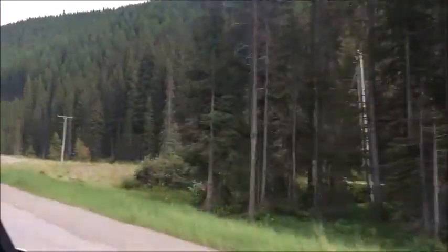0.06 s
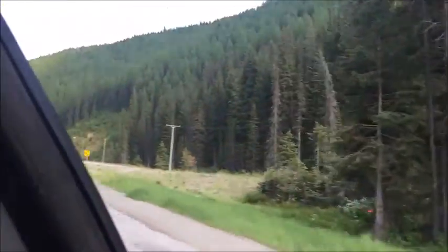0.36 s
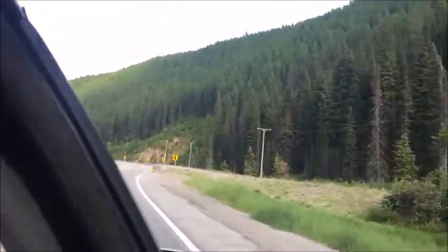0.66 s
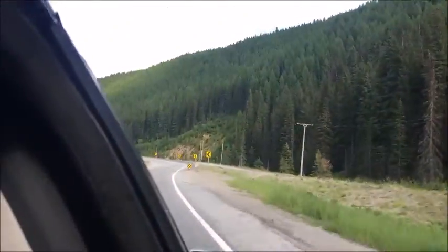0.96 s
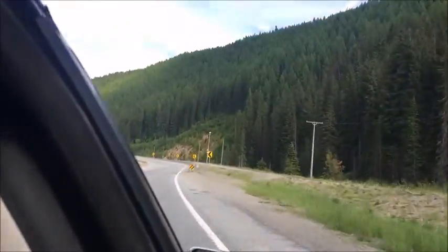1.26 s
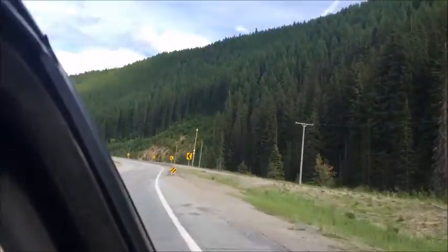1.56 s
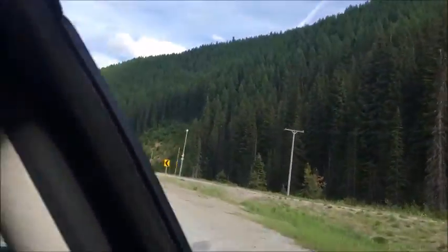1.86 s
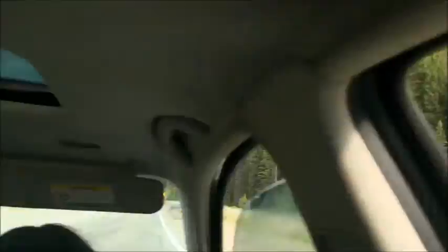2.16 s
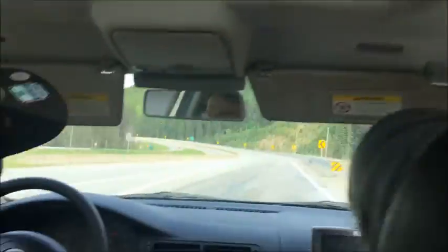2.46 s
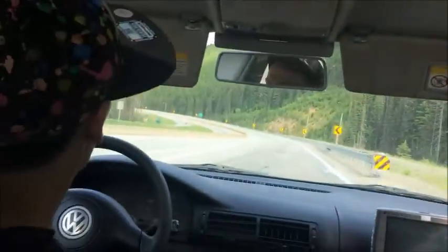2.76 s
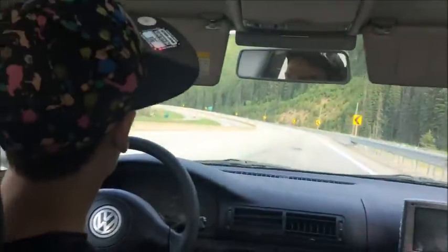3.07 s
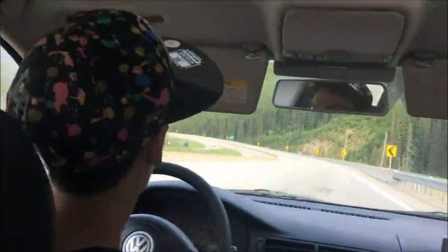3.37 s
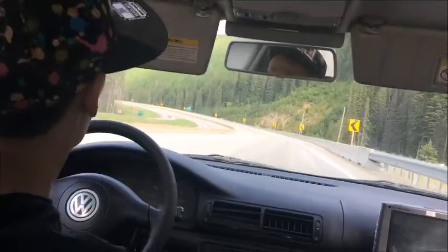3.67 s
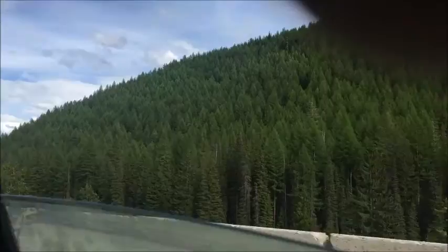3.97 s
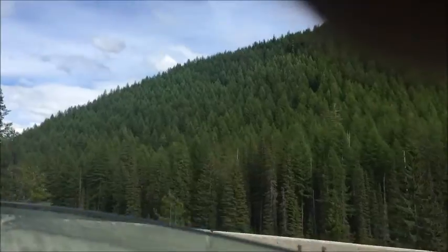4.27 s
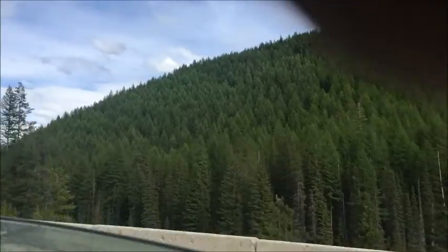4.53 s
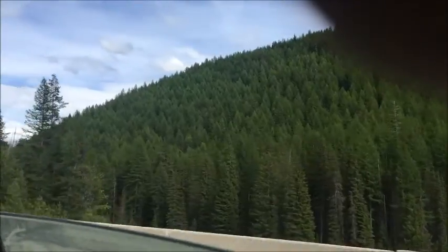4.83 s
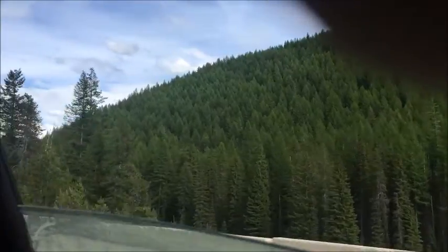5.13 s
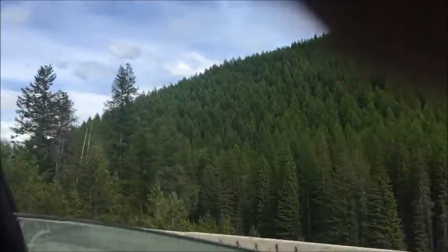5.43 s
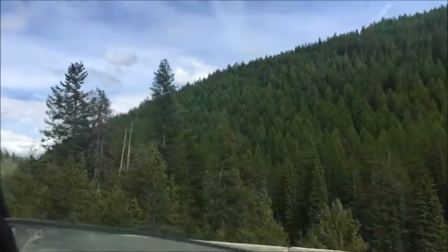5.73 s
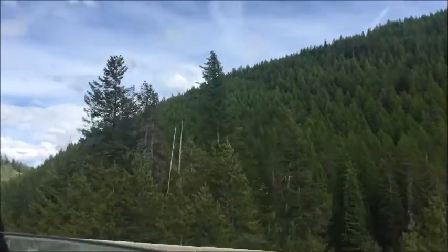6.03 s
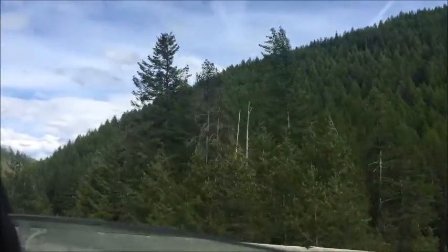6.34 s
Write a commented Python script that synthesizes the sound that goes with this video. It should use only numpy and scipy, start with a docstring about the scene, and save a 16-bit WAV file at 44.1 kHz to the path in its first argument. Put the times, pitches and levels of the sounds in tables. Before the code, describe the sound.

Rough, slapping wind on the microphone of a moving car, interrupted by a short stretch of swelling engine hum and road rumble.

```python
"""A car on a mountain road, a microphone at its open side window. First the slipstream tears at it:
rushing, fizzing turbulence, with eddies that slap and overload it. At 2.2 s it is drawn inside: a dull
knock, then engine boom, body rumble and tyre roar swell while the revs creep up and the trim ticks.
At 4 s the sound breaks off briefly. Back at the window's edge the air is thin and fitful, and single
eddies slap the microphone and overload it again."""
import sys
import numpy as np
from scipy import signal
from scipy.fft import rfft, irfft, next_fast_len
from scipy.io import wavfile
from scipy.ndimage import map_coordinates

SR = 44100
rng = np.random.default_rng(int(sys.argv[2]) if len(sys.argv) > 2 else 0)


def digitize_waveform(pressure):
    """Quantize a signal to 16-bit integers and store it at the path in sys.argv[1].

    Rows of a 2-D input are taken as channels; values are limited to [-1, 1].
    """
    field = np.atleast_2d(pressure).T
    bounded = np.clip(field, -1, 1)
    quanta = np.round(bounded * 32767).astype(np.int16)
    wavfile.write(sys.argv[1], SR, quanta)


N = 286650
TIME = np.arange(N) / SR
INSIDE_S, BREAK_S, RESUME_S = 2.235, 4.02, 4.098


def amp(db):
    """Decibels to gain."""
    return 10 ** (np.asarray(db) / 20)

def unit(x):
    """Scale to rms 1."""
    return x / np.sqrt(np.mean(x ** 2) + 1e-20)

def curves(rows):
    """One automation curve for each column after the time."""
    times, *columns = np.transpose(rows)
    return [np.interp(TIME, times, column) for column in columns]

def fade(start_s, length_s):
    """A ramp from 0 to 1."""
    return np.clip((TIME - start_s) / length_s, 0, 1)

def wobble(rate):
    """A smooth random modulator, rate knots a second."""
    knots = rng.standard_normal(int(N * rate / SR) + 4)
    return map_coordinates(knots, [np.arange(N) * rate / SR])

def eq_gain(hz, spectrum):
    """Gain at hz of an EQ curve drawn through (frequency [Hz], level [dB]) points."""
    points_hz, db = np.transpose(spectrum)
    return amp(np.interp(np.log(hz + 1), np.log(points_hz), db))

def filtered(x, response):
    """Zero-phase EQ; response gives the gain at each frequency."""
    size = next_fast_len(N + SR // 2)
    return irfft(rfft(x, size) * response(np.fft.rfftfreq(size, 1 / SR)), size)[:N]

def noise(spectrum):
    """Coloured noise of rms 1."""
    return unit(filtered(rng.standard_normal(N), lambda hz: eq_gain(hz, spectrum)))

def ringing(x, spectrum):
    """Minimum-phase EQ that keeps the power of white noise: attacks stay sharp, the bass rings on."""
    size = 4096
    log_gain = np.log(eq_gain(np.fft.rfftfreq(size, 1 / SR), spectrum))
    cepstrum = irfft(log_gain) * (1 + np.sign(size / 2 - np.arange(size)))
    response = irfft(np.exp(rfft(cepstrum)))
    return signal.fftconvolve(x, response / np.linalg.norm(response))[:N]

def puffs(swirl, depth_db):
    """White noise that surges with the swirl; the strongest swirls level off."""
    return unit(amp(depth_db * 2 * np.tanh(swirl / 2))) * rng.standard_normal(N)

def turbulence(swirl, spectrum, depth_db):
    """Coloured puffs of air, rms about 1."""
    return ringing(puffs(swirl, depth_db), spectrum)


# Bright click of plastic trim: (frequency [Hz], level [dB])
TRIM_EQ = [(1500, -17), (4000, -1), (4900, -16.5), (5700, 2), (7000, -21), (8800, -11), (11000, -24),
           (15000, -26)]
# Hollow, dull knock: (frequency [Hz], level [dB])
KNOCK_EQ = [(60, -15), (130, 9), (300, -8), (600, 2.5), (1000, -28), (2500, -45), (8000, -62)]
# Cues for the trim ticks: (time [s], relative level [dB])
TRIM_TICKS = [(2.4277, -49), (2.51, -41), (3.1264, -40), (3.685, -36), (3.8627, -33)]

def ticks_and_knock():
    """Light, dry ticks of plastic trim, and one knock as the microphone comes inside."""
    def tap(start, decay_s):
        return fade(start, .001) * np.exp(-np.abs(TIME - start) / decay_s)
    ticks = sum(amp(db - 5.5) * tap(start, decay_s=.007) for start, db in TRIM_TICKS)
    knock = amp(-19.5) * tap(2.325, decay_s=.0084)
    return ticks * noise(TRIM_EQ) + knock * noise(KNOCK_EQ)

# Low rumble of the car body: (frequency [Hz], level [dB])
RUMBLE_EQ = [(15, -24.5), (30, -22), (50, -5.5), (68, 1.5), (90, -8.5), (140, -17), (200, -25.5),
             (320, -34), (600, -43), (1500, -87)]
# Tyre roar through the glass: (frequency [Hz], level [dB])
TYRE_EQ = [(100, -1), (280, 4), (480, -5), (750, -2.5), (1150, -1), (1400, -5), (1750, -5), (2200, -14),
           (3000, -21.5), (4200, -25), (5800, -31.5), (7500, -39.5), (10500, -44), (15500, -37.5)]
# Faders of the cabin swell, in relative levels: (time [s], engine [dB], rumble [dB], tyres [dB])
CABIN_SWELL = [(2.37, -44, -43.5, -50), (2.65, -27.5, -35, -52), (3.1, -22.5, -24.5, -44.5),
               (3.68, -18.5, -23.5, -36), (4.0, -19, -20.5, -38)]

def road():
    """The uneven road makes the body heave and rumble while the tyres roar through the glass."""
    _, rumble_db, tyre_db = curves(CABIN_SWELL)
    heave_db = 2 * np.cos(2 * np.pi * (TIME - 3.37) / .293)  # a crest every 0.293 s
    rumble = amp(rumble_db + 4 + heave_db) * noise(RUMBLE_EQ)
    tyres = amp(tyre_db + 4.5 + .66 * wobble(12)) * noise(TYRE_EQ)
    return rumble + tyres

# Partials of the engine boom: (multiple of the firing rate [x], relative level [dB])
ENGINE_PARTIALS = [(1, 2.5), (2, -11), (3, -29)]

def engine():
    """The firing rate and its overtones boom in the cabin, wavering and creeping up in pitch."""
    boom_db, _, _ = curves(CABIN_SWELL)
    firing_hz = 104.5 + 5.5 * (TIME - INSIDE_S)
    phase = 2 * np.pi * np.cumsum(firing_hz * (1 + .0027 * wobble(18))) / SR
    boom = sum(amp(db + wobble(22)) * np.sin(k * phase) for k, db in ENGINE_PARTIALS)
    return np.sqrt(2) * amp(boom_db) * boom

USUAL_FLOW_DB, BUFFET_SLOPE = -14.5, .34  # reference wind strength; dB of buffeting per dB of flow
# Low-mid rush, the body of all the wind: (frequency [Hz], level [dB])
RUSH_EQ = [(40, -39), (130, -12), (240, -0.5), (390, -3), (570, -1.5), (1000, -7), (2000, -18),
           (3200, -28.5), (5000, -62), (8000, -70), (15000, -85)]
# Coarse midrange grit of torn air: (frequency [Hz], level [dB])
GRIT_EQ = [(400, -19.5), (1000, -0.5), (2000, -0.5), (3200, -5.5), (4300, -9.5), (6000, -27.5),
           (9000, -38.5), (15000, -59.5)]
# Bass buffeting on the microphone: (frequency [Hz], level [dB])
BUFFET_EQ = [(15, -32), (30, -36.5), (48, -1), (65, -0.5), (100, -3), (160, -7.5), (250, -15), (500, -24),
             (1500, -81)]
# Steady bed of air hiss: (frequency [Hz], level [dB])
HISS_EQ = [(300, -2), (1200, 5), (3000, -25.5), (6500, -28), (9000, -30), (15500, -39)]
# The weaker flow at the window's edge: (time [s], relative level [dB])
EDGE_FLOW = [(4.1, -18.5), (4.29, -30), (4.45, -12), (4.56, -25), (4.7, -14), (4.83, -15.5), (4.9, -23.5),
             (5.08, -19), (5.19, -30.5), (5.3, -24), (5.45, -20), (5.85, -25.5), (6.15, -24), (6.35, -26),
             (6.5, -17.5)]

def window_edge():
    """Thin, fitful turbulence over a faint hiss; the buffeting flaps with the larger swirls."""
    flow_db = curves(EDGE_FLOW)[0] + lulls()
    flap = wobble(45)
    swirl = unit(.5 * flap + .44 * wobble(130) + .85 * wobble(400))
    rush = amp(flow_db + 2) * turbulence(swirl, RUSH_EQ, depth_db=9.5)
    grit = amp(flow_db - 15.5) * turbulence(swirl, GRIT_EQ, depth_db=14)
    buffet_db = -13.5 + BUFFET_SLOPE * (flow_db - USUAL_FLOW_DB)
    buffet = amp(buffet_db) * turbulence(flap, BUFFET_EQ, depth_db=6)
    hiss = amp(-43) * noise(HISS_EQ)
    return (rush + grit + buffet + hiss) * fade(RESUME_S, .0016)

def lulls(dip_db=-9.5, length_s=.023):
    """Ducking in dB as the air stalls just before each strong eddy breaks."""
    starts = np.append(np.sort(np.transpose(EDDY_HITS)[0]), np.inf)
    wait = starts[np.searchsorted(starts, TIME)] - TIME
    return dip_db * np.exp(-(wait / length_s) ** 2)

# Fizzing top end of fast air: (frequency [Hz], level [dB])
FIZZ_EQ = [(1000, -24.5), (2500, 2.5), (4200, 0), (6300, -2.5), (8000, -14), (9500, -14), (10500, -19),
           (15500, -20.5)]
# Sharp crack of the overloaded microphone: (frequency [Hz], level [dB])
CRACK_EQ = [(400, -1.5), (1500, 3), (4000, 8), (6300, 0.5), (9000, -10), (10500, -19.5), (15500, -32)]
# The full slipstream, falling as the microphone is drawn in: (time [s], relative level [dB])
SLIPSTREAM_FLOW = [(0, -15), (.2, -17), (.5, -14.5), (1.0, -13.5), (1.3, -13.5), (1.7, -13), (1.9, -13.5),
                   (2.1, -12), (2.17, -17), (2.26, -27.5)]

def slipstream(snaps_per_s=19):
    """Dense turbulence of several sizes, with sharp snaps; the stronger the flow, the brighter."""
    flow_db, = curves(SLIPSTREAM_FLOW)
    excess_db = flow_db - USUAL_FLOW_DB
    fizz_db = -40 + 3.7 * excess_db
    grit_db = .29 * flow_db + .71 * fizz_db + 2.565
    swirl = unit(.11 * wobble(59.76) + .8 * wobble(190) + .5 * wobble(600))
    tearing = unit(swirl + .68 * wobble(1400))
    rush = amp(flow_db) * turbulence(swirl, RUSH_EQ, depth_db=5.5)
    grit = amp(grit_db) * turbulence(tearing, GRIT_EQ, depth_db=9)
    fizz = amp(fizz_db) * turbulence(tearing, FIZZ_EQ, depth_db=12)
    snaps = (rng.random(N) < snaps_per_s / SR) * amp(fizz_db + 24 + 5 * tearing)
    shelter_db = -9 * fade(2.06, .1)  # the window frame takes the buffeting away first
    buffet_db = -11.5 + BUFFET_SLOPE * excess_db + shelter_db
    buffet = amp(buffet_db) * turbulence(swirl, BUFFET_EQ, depth_db=2)
    return (rush + grit + fizz + ringing(snaps, CRACK_EQ) + buffet) * (1 - fade(INSIDE_S, .043) ** 2)

# Fat body of an eddy's slap: (frequency [Hz], level [dB])
SLAP_EQ = [(60, -21), (170, 0), (260, 3), (400, -1), (600, -3), (1100, -7.5), (2000, -15), (3200, -23.5),
           (5000, -43), (8000, -65.5), (15000, -74)]
# Strong eddies hitting the microphone, in relative levels:
# (time [s], body [dB], treble [dB], bass [dB], life [s])
EDDY_HITS = [(0.283, 3, -33.5, -14.5, 0.0062), (0.319, -2.5, -25.5, -6, 0.011),
             (0.509, 2.5, -23, -3.5, 0.0086), (0.594, -2.5, -22.5, -4.5, 0.011),
             (0.611, -2, -28, -6.5, 0.0042), (0.696, 5, -36, -4, 0.01), (0.785, 1, -23, -13, 0.011),
             (0.901, 4.5, -21, -11, 0.011), (1.049, -3, -21.5, -13, 0.012), (1.115, 0.5, -25, -10, 0.02),
             (1.224, -4, -20, -13, 0.0064), (1.411, 5.5, -22, -9, 0.012), (1.486, 3.5, -20, -15, 0.0098),
             (1.613, 3, -23, -17, 0.016), (1.666, -3, -25, -7, 0.012), (1.702, 4.5, -20, -8, 0.015),
             (1.788, 0, -25.5, -5, 0.016), (2.066, -7, -24, -15, 0.0079), (2.136, -1, -28, -13.5, 0.0098),
             (2.203, -4, -27.5, -8.5, 0.012), (2.22, -3, -29.5, -29, 0.013),
             (2.253, -10.5, -38, -17, 0.0093), (4.098, -0.5, -38, -10, 0.009),
             (4.112, -3.5, -45, -13.5, 0.0074), (4.125, -1.5, -43.5, -13, 0.007),
             (4.193, -0.5, -41, -9.5, 0.013), (4.216, 2.5, -33.5, -13, 0.011),
             (4.251, -2.5, -50, -21, 0.017), (4.302, 0.5, -41, -13.5, 0.006), (4.343, 2, -36, -16, 0.012),
             (4.403, 2, -35, -7, 0.011), (4.417, 2.5, -27.5, -14, 0.0072), (4.448, 1, -34.5, -12, 0.0057),
             (4.48, -1, -36, -14.5, 0.013), (4.524, -5.5, -43.5, -17.5, 0.0086),
             (4.584, -0.5, -34, -12.5, 0.013), (4.675, 3.5, -24, -9, 0.01), (4.71, -4, -36.5, -8, 0.011),
             (4.748, -2, -16, -7.5, 0.0057), (4.795, 2.5, -29, -7, 0.0085), (4.832, -5, -33, -9, 0.025),
             (4.909, 6.5, -20.5, -4.5, 0.013), (4.943, 6, -25.5, -14, 0.0094),
             (4.987, -2.5, -32, -18, 0.011), (5.028, 2, -24, -9, 0.0091), (5.068, 3, -30, -14, 0.0041),
             (5.188, -5, -57, -23.5, 0.0048), (5.245, -5.5, -60, -20, 0.011),
             (5.383, -7.5, -32.5, -8.5, 0.014), (5.414, 1, -29, -13, 0.011), (5.445, 7, -16, -6, 0.0086),
             (5.491, 2, -31, -4, 0.014), (5.552, -8.5, -28.5, -14, 0.013), (5.574, -0.5, -31.5, -17, 0.015),
             (5.66, 4, -23.5, -8.5, 0.017), (5.715, -0.5, -29, -11, 0.017), (5.781, -1, -28.5, -25, 0.012),
             (5.828, -4.5, -39, -23, 0.0097), (5.89, 2, -29, -10, 0.012), (5.972, 4.5, -22, -10.5, 0.01),
             (6.017, -7, -56, -12, 0.013), (6.07, -5, -44, -15.5, 0.014), (6.158, 0.5, -31, -10.5, 0.014),
             (6.215, -3, -38, -9, 0.0079), (6.242, 5.5, -24.5, -7, 0.011), (6.318, 0.5, -27.5, -7.5, 0.011),
             (6.385, 1.5, -36, -15.5, 0.0083), (6.413, -1, -27.5, -13.5, 0.0086),
             (6.464, -1.5, -34, -9.5, 0.013)]

def eddies(thump_hz=86.9):
    """Ragged slaps, each with a crackling front and a thump; sharp ones make the microphone crack."""
    t = np.arange(SR // 12) / SR
    body, grit, fronts, cracks, thumps = np.zeros((5, N + SR))
    swirl = wobble(650)
    rough = np.pad(puffs(swirl, depth_db=6.5), (0, SR))
    spiky = np.pad(puffs(swirl, depth_db=16.5), (0, SR))
    for start, body_db, treble_db, bass_db, life in np.vstack([EDDY_HITS, trailing_eddies()]):
        detune, phase = rng.standard_normal(2)
        span = slice(round(start * SR), round(start * SR) + len(t))
        burst = (1 - np.exp(-t / .00046)) * np.exp(-(t / life) ** 3)
        hold = np.sqrt(life / t[-1])  # short and long bursts play at the same level
        body[span] += hold * amp(-11 + 1.07 * body_db) * unit(burst * rough[span])
        grit[span] += hold * amp(treble_db + 5) * unit(burst * spiky[span])
        sharpness_db = treble_db + 23.5
        fronts[span] += hold * amp(-28.5 + 1.3 * sharpness_db) * unit(burst ** 3 * spiky[span])
        jolt = rough[span] * np.exp(-np.abs(t - .002) / .0001)
        cracks[span] += amp(1.5 + 1.23 * sharpness_db) * jolt / np.linalg.norm(jolt)
        # A low thump rings on in the microphone after each blast, dropping in pitch.
        cycles = thump_hz * np.exp(.3 * detune) * (t + .01335 * (1 - np.exp(-t / .0077)))
        envelope = (1 - np.exp(-t / .0032)) * np.exp(-t / .013)
        thumps[span] += amp(8.5 + bass_db) * envelope * np.sin(2 * np.pi * (cycles + phase))
    crackle = ringing(grit, GRIT_EQ) + ringing(fronts, FIZZ_EQ) + ringing(cracks, CRACK_EQ)
    return ringing(body, SLAP_EQ) + crackle + thumps[:N]

def trailing_eddies():
    """Each strong eddy sheds a short, weaker, duller one soon after; rows as in EDDY_HITS."""
    start, body_db, treble_db, bass_db, _ = np.transpose(EDDY_HITS)
    lag, size, stretch = rng.standard_normal((len(EDDY_HITS), 3)).T
    delay_s = .017 * np.exp(.2 * lag)
    loss_db, dulling_db = 9.5 - .5 * size, 23 - 3 * size
    life_s = np.maximum(.0049 * np.exp(.23 * stretch), .002)
    return np.column_stack([start + delay_s, body_db - loss_db, treble_db - dulling_db,
                            bass_db - loss_db, life_s])

def scene():
    """Wind at the window, the cabin, a short silence, then wind again."""
    cabin = engine() + road() + ticks_and_knock()
    cabin_gate = fade(INSIDE_S, .02) * (1 - fade(BREAK_S, .0015))
    return (cabin * cabin_gate + slipstream() + window_edge() + eddies())[None]

def record(dry):
    """The microphone soft-clips the strongest blows, rolls off the treble and cuts the very top."""
    ceiling, rolloff_hz, top_hz = .99, 10000, 15900
    clipped = dry[0] / (1 + np.abs(dry[0] / ceiling) ** 5) ** (1 / 5)
    return filtered(clipped, lambda hz: (hz < top_hz) / np.sqrt(1 + (hz / rolloff_hz) ** 4))[None]


dry = scene()
out = record(dry)
digitize_waveform(out)
```